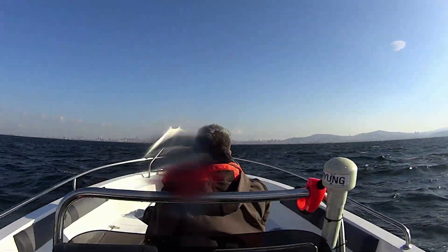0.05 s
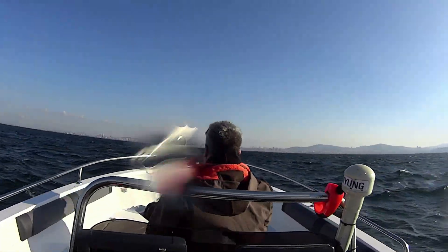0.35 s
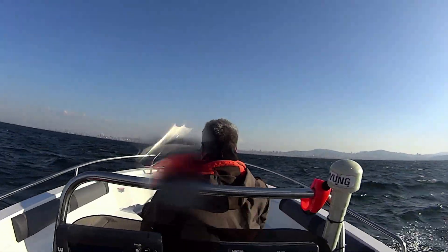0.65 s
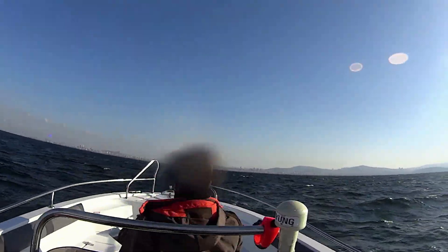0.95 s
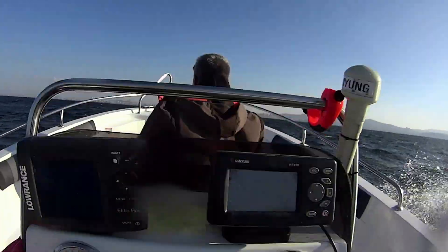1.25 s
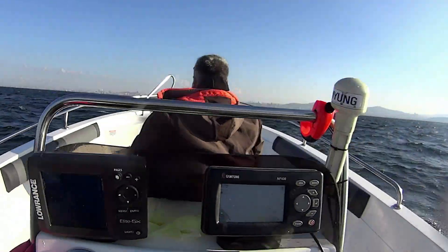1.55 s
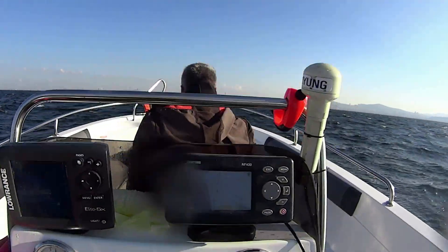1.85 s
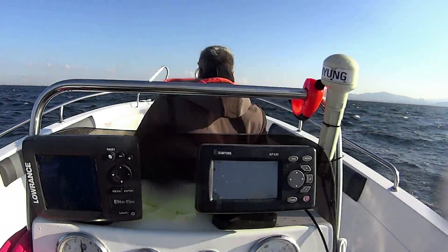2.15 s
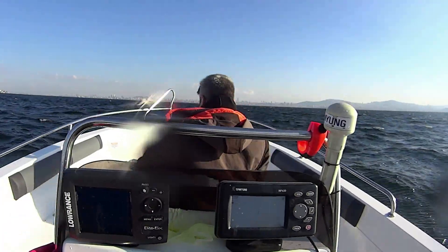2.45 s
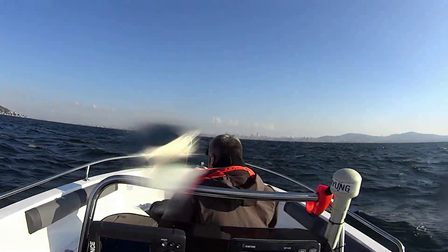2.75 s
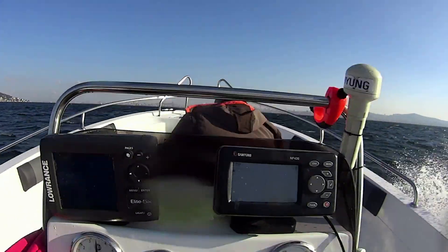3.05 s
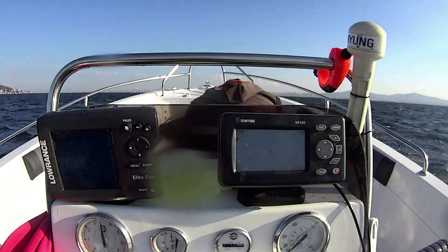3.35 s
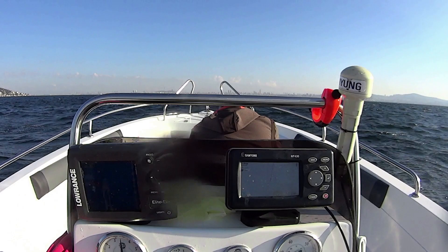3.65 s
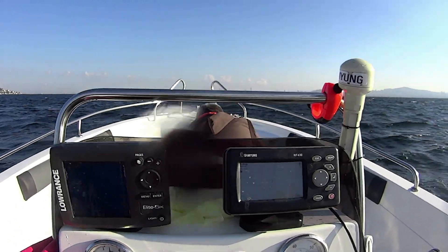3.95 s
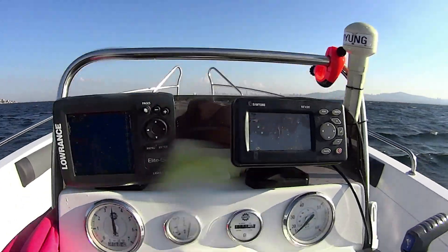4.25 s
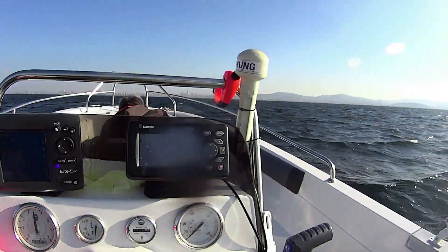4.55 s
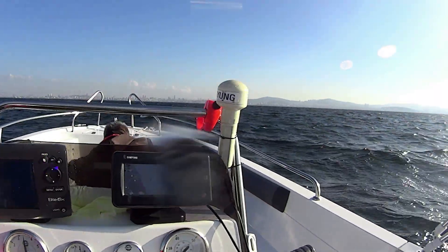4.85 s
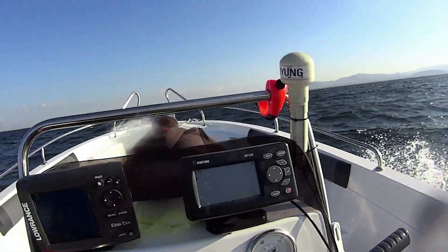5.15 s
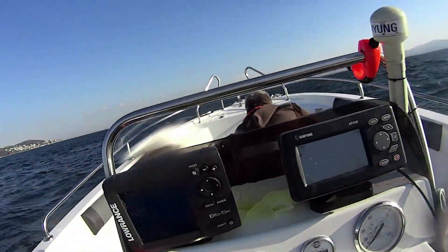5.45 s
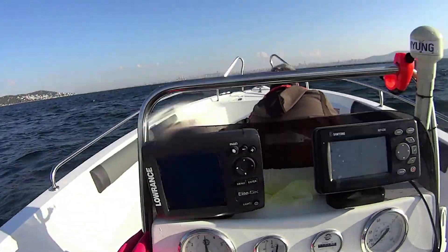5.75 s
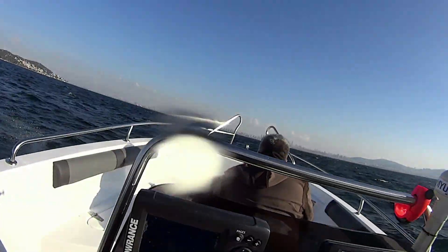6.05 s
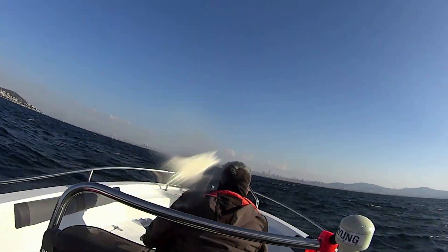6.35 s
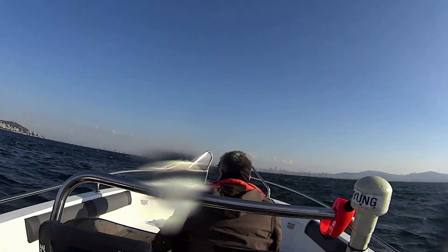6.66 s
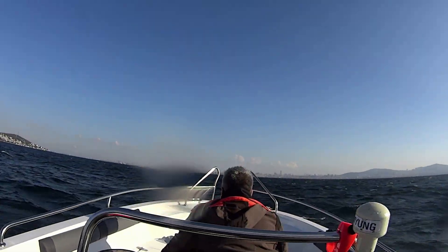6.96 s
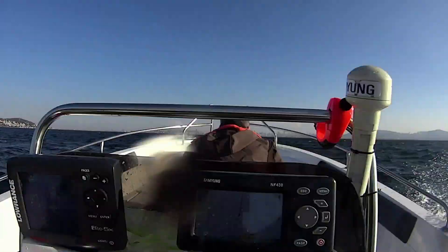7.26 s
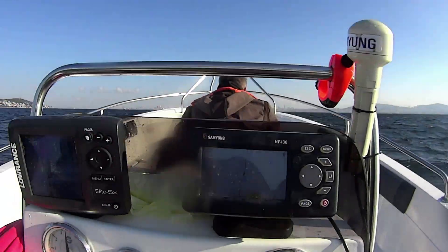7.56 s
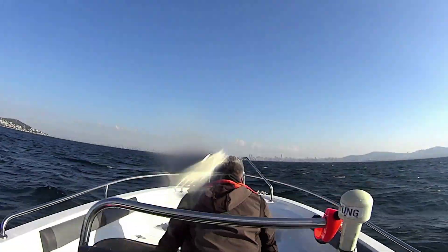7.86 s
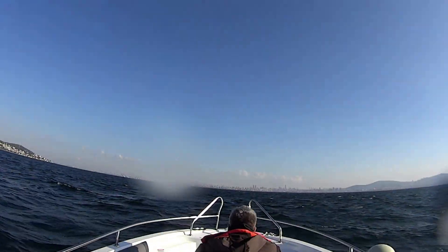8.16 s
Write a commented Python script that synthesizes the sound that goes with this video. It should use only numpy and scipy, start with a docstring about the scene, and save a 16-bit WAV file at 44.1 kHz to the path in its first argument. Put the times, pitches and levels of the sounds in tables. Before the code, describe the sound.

A small motorboat runs through choppy sea, with gusting wind, a steady outboard drone, hollow rushing water and sharp wave slaps.

```python
"""A small open motorboat runs through choppy sea, heard from inside a waterproof case at the helm.
From the start wind buffets the case and whistles at its edge, the outboard drones, the bow thumps and slaps
into waves, and rushing water rings the shell, hollow and nasal. Just before 5 s loose gear raps; then spray
hisses, hard drops strike and the wet case sings. Near 7 s the wind moans and a big wave smacks the hull,
and the ride ends in rising wind and water."""
import sys
import numpy as np
from scipy import signal
from scipy.fft import rfft, irfft, next_fast_len
from scipy.io import wavfile
from scipy.ndimage import uniform_filter1d, map_coordinates

SR = 44100
rng = np.random.default_rng(int(sys.argv[2]) if len(sys.argv) > 2 else 0)


def inscribe(sig):
    """Save sig as 16-bit PCM at rate SR to the path in sys.argv[1].

    A 1-D sig is mono; a 2-D sig holds one channel per row.
    Samples are clipped to [-1, 1] before scaling.
    """
    pcm = np.round(np.clip(np.atleast_2d(sig).T, -1, 1) * 32767)
    wavfile.write(sys.argv[1], SR, pcm.astype(np.int16))


N = 370440

# Air speed over the case. Each row: time in seconds, buffeting level in dB.
AIR_SPEED = [(0, -36), (0.45, -34.5), (0.62, -34), (1.0, -34), (1.35, -37), (1.6, -38.5), (1.85, -33),
             (2.03, -36), (2.25, -30.5), (2.55, -33.5), (2.9, -28.5), (3.35, -36.5), (3.6, -34),
             (4.1, -32.5), (4.6, -37.5), (5.75, -33), (6.45, -32), (6.63, -33.5), (7.2, -28.5),
             (7.33, -40.5), (7.6, -36), (8.0, -29.5), (8.4, -30.5)]
# The hollow resonances of the case's shell. Each row: centre in Hz, width in Hz, gain in dB.
SHELL_MODES = [(1509, 105, 9.5), (1654, 93, 7), (1873, 94, -1.5), (2320, 83, -15), (2750, 190, -8.5),
               (4050, 780, -15)]
# The bright colour of a splash or a snap. Each row: frequency in Hz, level in dB.
SPLASH_SPECTRUM = [(400, -10), (1200, -5), (2300, 4.5), (3500, -4), (4700, -0.5), (6200, -10),
                   (7500, -12.5), (11000, -29.5)]
USUAL_AIR_DB = -32


def wind():
    """Eddies buffet the case; the faster ones whistle at its edge and make the shell sizzle."""
    # Brief lulls. Each row: time in seconds, drop in dB.
    lulls = [(.48, 9), (1.3, 12), (3.33, 6), (4.035, 10), (4.79, 2), (6.16, 2.5), (6.675, 3.5), (7.55, 3),
             (8.16, 2)]
    # The hardest gusts. Each row: time in seconds, then buffet, whistle and sizzle levels in dB.
    gusts = [(.63, -32, -35, -45), (.86, -35, -43, -50), (.95, -49, -61, -44), (1.42, -41, -42, -56),
             (1.635, -40, -39, -50), (2.28, -44, -42, -44), (3.21, -35.5, -43, -58),
             (3.975, -33, -30.5, -55), (4.11, -36, -35, -49), (4.885, -32.5, -37.5, -43.5),
             (5.88, -26.5, -44, -54), (6.015, -34, -31.5, -50), (6.228, -30, -27, -44),
             (6.43, -33, -35, -43), (7.246, -29.5, -34, -46), (7.869, -33.5, -34.5, -48),
             (8.065, -26, -38, -52)]
    # How readily the edge whistles. Each row: time in seconds, level in dB at the usual air speed.
    whistle_levels = [(0, -44.5), (1.0, -49.5), (2.3, -48), (2.8, -52), (3.6, -43.5), (4.6, -54.5),
                      (6.1, -41.5), (8.4, -48.5)]
    # The shell's sizzle. Each row: time in seconds, level in dB.
    sizzle_levels = [(0, -48), (0.3, -56), (0.6, -47.5), (0.93, -51), (1.3, -57.5), (1.85, -50),
                     (2.03, -65), (2.25, -53), (2.85, -47.5), (3.3, -60.5), (3.7, -52.5), (4.55, -55.5),
                     (5.4, -55), (6.4, -49), (6.7, -52), (7.15, -47), (7.45, -62), (8.0, -51.5),
                     (8.4, -51.5)]
    # Low buffet, sharp whistle and thin sizzle. Each row: frequency in Hz, level in dB.
    buffet_spectrum = [(50, -11), (110, 0), (170, 0), (250, -0.5), (380, -0.5), (480, -5), (700, -17.5),
                       (1000, -23), (1400, -16.5), (2300, -16.5), (3500, -36), (6000, -61)]
    whistle_spectrum = [(1800, -2), (2700, -6), (3150, 1), (3350, 3), (3550, 4.5), (3750, -4.5), (4000, -9),
                        (6000, -50)]
    sizzle_spectrum = [(3600, -53), (4350, -1), (4720, 5), (5020, -3.5), (5500, -10), (7000, -24)]
    eddies_per_s, flutter_per_s, hold_from_db = 42, 125, -45
    (air_db,), (ready_db,), (sizzle_db,) = curves(AIR_SPEED), curves(whistle_levels), curves(sizzle_levels)
    air_db = air_db - sum(db * swell(s, half_length=0.027) for s, db in lulls)
    eddies = wobble(eddies_per_s)
    gust_shapes = np.array([swell(s, half_length=0.013) for s, *_ in gusts])
    gust_buffet, gust_whistle, gust_sizzle = amp(np.array(gusts)[:, 1:]).T @ gust_shapes
    buffet = np.hypot(amp(air_db + 1.28 * eddies), gust_buffet) * rush(colour(buffet_spectrum), grain_db=1.5)
    # the whistle grows much faster with air speed than the buffeting does
    whistle_db = ready_db + 2.43 * (air_db - USUAL_AIR_DB)
    # it catches and drops out in gritty bursts; in hard air they run together into a rattle
    catching = np.tanh(1.3 * eddies + 1.5 * wobble(flutter_per_s) - .3)
    held = np.clip((whistle_db - hold_from_db) / 2, 0, 0.6)
    flutter_db = 8.5 * ((1 - held) * catching + 0.44 * held)
    whistle_gain = np.hypot(amp(whistle_db + flutter_db), gust_whistle * amp(4.4 * catching - 3.0))
    whistle = whistle_gain * rush(colour(whistle_spectrum))
    sizzle_gain = np.hypot(amp(sizzle_db + 0.92 * eddies + 2.8 * wobble(70)), gust_sizzle)
    return buffet + whistle + sizzle_gain * rush(colour(sizzle_spectrum))


def water():
    """The bow wave churns along the hull and rings the shell; sheets of it break into spray."""
    # Water rushing along the hull. Each row: time in seconds, level in dB.
    rush_levels = [(0, -39), (0.2, -37.5), (0.5, -42), (1.0, -36.5), (1.35, -42), (1.95, -39), (2.5, -39),
                   (3.35, -39.5), (3.9, -37), (4.75, -38), (5.4, -34.5), (5.75, -36.5), (6.0, -34),
                   (6.8, -39.5), (7.17, -32.5), (7.35, -40), (7.68, -38), (8.1, -32.5), (8.4, -33)]
    # Sheets of water thrown from the bow, and one short, bright knock near 3.8 s.
    # Each row: time in seconds, level in dB, half length in seconds, spray level in dB.
    surges = [(1.1, -38.5, 0.12, -84), (1.888, -28.5, 0.045, -56), (3.678, -33.5, 0.041, -55),
              (3.831, -24.5, 0.0051, -56), (4.21, -31, 0.059, -64), (5.316, -34, 0.031, -40.5),
              (5.502, -38, 0.043, -40), (5.71, -35.5, .016, -37.5), (7.142, -51, 0.099, -53)]
    # The shell's strongest ring. Each row: centre in Hz, width in Hz, gain in dB.
    note_modes = [(1594, 114, 0.5), (1444, 140, -3)]
    # Open wash, the sheets and knock, and fine spray. Each row: frequency in Hz, level in dB.
    wash_spectrum = [(200, -69), (700, 14.5), (1150, 1.5), (2100, 6), (2600, -38), (3100, -25), (4000, -15),
                     (5000, -27), (7000, -23)]
    surge_spectrum = [(300, 3), (1000, -12), (1400, 8.5), (1800, 8.5), (2300, 4.5), (2800, -3.5),
                      (4000, -14), (4700, -8.5), (6500, -24), (11000, -44)]
    spray_spectrum = [(1000, 10.5), (2500, 9.5), (4000, 6.5), (5300, 5.5), (6400, 1.5), (7300, 2.5),
                      (8500, -1), (10500, -6)]
    usual_rush_db, mist_db = -35.5, -49.5
    (rush_db,), (air_db,) = curves(rush_levels), curves(AIR_SPEED)
    churn = amp(rush_db + 3.14 * np.tanh(wobble(25)))
    hollow = amp(-2) * rush(ringing(SHELL_MODES), grain_db=2.5)
    # the wash grows as the wind tears at the water
    wash = amp(-12.5 + 0.37 * (air_db - USUAL_AIR_DB)) * rush(colour(wash_spectrum), grain_db=3.5)
    # faster water rings the shell much harder
    note = amp(-39 + 2.26 * (rush_db - usual_rush_db)) * rush(lambda hz: ringing(note_modes)(hz) ** 2)
    surging = sum(amp(db) * swell(s, half_length) for s, db, half_length, _ in surges)
    showers = sum(amp(db) * swell(s, half_length) for s, _, half_length, db in surges)
    sheets_and_knock = surging * rush(colour(surge_spectrum), grain_db=4.0)
    spray = (amp(mist_db) + showers) * rush(colour(spray_spectrum), grain_db=1.46)
    return churn * (hollow + wash) + note + sheets_and_knock + spray


def waves():
    """Each slap rings the shell at its own pitch, with a splash; hard landings knock and thump the hull."""
    # Waves slapping the hull. Each row: start in seconds, level in dB, rise and decay in seconds,
    # splash in dB relative to the slap, ring pitch in Hz.
    slaps = [(.139, -30, 0.0012, 0.0059, -17, 1550), (.164, -30, .0012, .016, -13, 1487),
             (1.066, -26, 0.0014, 0.0097, -23, 1736), (1.116, -24.5, .0014, 0.0074, -9, 1560),
             (1.987, -26.5, 0.0011, 0.0072, -16, 1690), (3.818, -25, 0.0014, 0.0061, -9, 1940),
             (3.983, -20.5, 0.0035, 0.0046, -17, 1470), (4.206, -27.5, .004, 0.046, -27, 1634),
             (4.365, -25, .002, 0.0048, -13, 1490), (4.965, -34.5, 0.0047, 0.012, 1, 1540),
             (5.478, -23, 0.0022, 0.013, -4, 1536), (5.53, -22, 0.0036, 0.013, -8, 1525),
             (5.547, -15.5, 0.0042, 0.0018, -14.5, 1900), (5.962, -20.5, 0.0014, 0.0036, -23, 1470),
             (6.028, -25, 0.0067, 0.021, -27, 1530), (6.613, -26, 0.0043, 0.007, -11, 1531),
             (7.1503, -16, 0.0039, .013, -15, 1470), (7.185, -20.5, .004, 0.023, -24, 1520),
             (7.26, -25, .003, 0.023, -34, 1633), (7.472, -24.5, 0.0019, 0.0064, -10, 1424)]
    # The hull landing. Each row: start in seconds, level in dB, decay in seconds, knock pitch in Hz.
    thumps = [(0.051, -23.5, 0.013, 100), (0.696, -30, 0.025, 189), (1.412, -31, 0.042, 330),
              (1.754, -21.5, 0.025, 175), (2.31, -33, 0.013, 95), (3.647, -23.5, 0.027, 200),
              (3.899, -26, 0.032, 122), (3.975, -26, 0.017, 98), (4.867, -21.5, 0.013, 125),
              (5.086, -25, 0.028, 341), (5.131, -29.5, 0.023, 233), (5.534, -13.5, 0.0047, 220),
              (5.5396, -14, 0.0051, 480), (5.545, -23, 0.0042, 632), (5.554, -22, 0.0048, 1050),
              (5.566, -24, .008, 207), (5.598, -25, 0.016, 92), (6.023, -18, 0.012, 177),
              (7.178, -22, 0.013, 101), (7.178, -16, 0.0045, 280)]
    # A slap's drive on the shell, and the hull's thud. Each row: frequency in Hz, level in dB.
    smack_spectrum = [(600, 5), (1000, -16), (1350, 2.5), (2400, -8), (3000, -7), (3600, -4), (4500, -6)]
    thud_spectrum = [(25, -12), (70, -2), (130, -1), (215, 6.5), (340, 3), (580, -9.5), (900, -8),
                     (1300, -12), (2000, -7), (5000, -45)]
    landing_rise_s, landing_db = 0.0029, -4
    blows = [amp(db) * burst(s, rise, decay) for s, db, rise, decay, *_ in slaps]
    splashing = sum(blow * amp(splash_db) for blow, (*_, splash_db, _hz) in zip(blows, slaps))
    thwacks = sum(amp(db - 3) * burst(s, rise, decay, hz) for s, db, rise, decay, _, hz in slaps)
    landings = sum(amp(db + landing_db) * burst(s, landing_rise_s, decay) for s, db, decay, _ in thumps)
    knocks = sum(amp(db + landing_db) * burst(s, landing_rise_s, decay, hz) for s, db, decay, hz in thumps)
    shell_noise = rush(lambda hz: ringing(SHELL_MODES)(hz) * colour(smack_spectrum)(hz))
    smacks = sum(blows) * amp(-1.5) * solid(shell_noise, size=200)
    thuds = landings * solid(rush(colour(thud_spectrum)), size=500)
    splashes = splashing * rush(colour(SPLASH_SPECTRUM), grain_db=-1.5)
    return smacks + splashes + thuds + filtered(thwacks + knocks, ports)


def outboard():
    """The motor drones on its shaft harmonics; its speed sags and recovers as the propeller takes load."""
    # The drone's partials. Each row: multiple of the shaft rate, level in dB.
    harmonics = [(2, -41.5), (4, -49.5), (5, -42.5), (6, -40.5), (7, -47.5), (10, -54.5), (17, -58.5),
                 (19, -56)]
    # The drone swells and eases as the boat pitches. Each row: time in seconds, gain in dB.
    drone_gains = [(0, -.5), (.7, 3), (1.25, -.5), (2.8, 2.5), (3.4, 0), (4.6, -1), (5.8, -2), (7.15, 2),
                   (7.45, 1.5), (8.4, -0.5)]
    shaft_hz = 58.4
    speed = shaft_hz * (1 + 0.001617 * wobble(2.477) + 0.0022 * wobble(22))
    angle = 2 * np.pi * np.cumsum(speed) / SR
    drone = sum(amp(db + 1.48 * wobble(7)) * np.sin(round(k) * angle + rng.uniform(0, 2 * np.pi))
                for k, db in harmonics)
    drone_db, = curves(drone_gains)
    return filtered(amp(drone_db) * drone, ports)


def drops():
    """A drop on the case gives a dry tick, a crisp crack and a brief ring of the shell."""
    # Drops landing. Each row: time in seconds, strength in dB, then ring and crack offsets in dB.
    hits = [(2.281, -24, -30, 4), (4.28, -24, -14, -11), (5.009, -34, -7, 12), (5.55, -10, -14, -7),
            (6.2536, -5.5, -17, -22), (7.1977, -11, -11, -9)]
    # The case's tick and crack. Each row: centre in Hz, width in Hz, gain in dB.
    tick_modes = [(1880, 210, 2.5), (4320, 200, -2)]
    crack_modes = [(4730, 160, 3.5), (7160, 270, -4), (9800, 900, -11)]
    ticks, rings, cracks = np.zeros((3, N))
    for s, db, ring_db, crack_db in hits:
        at = round(s * SR)
        ticks[at] = amp(db + 23.5)
        rings[at] = amp(db + ring_db + 35.5)
        cracks[at] = amp(db + crack_db + 28.0)
    layers = (ticks, tick_modes), (rings, SHELL_MODES), (cracks, crack_modes)
    return filtered(sum(filtered(pulses, ringing(modes)) for pulses, modes in layers), ports)


def raps():
    """Loose gear strikes the boat: a bright snap and a short, hard ring."""
    # The raps. Each row: start in seconds, level in dB, length factor, snap in dB relative to the rap.
    hits = [(4.7065, -11.5, 0.97, -8), (4.7114, -15, 0.94, -16), (4.915, -17.5, 3.5, -6)]
    # The gear's ring. Each row: pitch in Hz, level in dB, decay in seconds at length factor 1.
    gear_modes = [(1480, -2, 0.0024), (1467, -14, .017), (1820, -5.5, 0.0024), (1990, -19, .014),
                  (2360, -11, 0.0046), (4500, -26, 0.0023), (4930, -16, 0.00098)]
    rise_s, snap_s = 0.0017, 0.0032
    rings = sum(amp(db + mode_db) * burst(s, rise_s * length, decay * np.sqrt(length), hz)
                for s, db, length, _ in hits for hz, mode_db, decay in gear_modes)
    snaps = sum(amp(db + snap_db) * burst(s, rise_s * length / 2, snap_s * length)
                for s, db, length, snap_db in hits)
    return filtered(rings, ports) + snaps * solid(rush(colour(SPLASH_SPECTRUM)), size=100)


def singing():
    """In heavy spray the wet case sings: a narrow ring whose pitch wanders and settles."""
    # The ring's path. Each row: time in seconds, pitch in Hz, pitch spread in Hz, level in dB.
    ring_path = [(4.95, 1594, 38.6, -80), (5.1, 1610, 26.6, -46), (5.33, 1612, 28.7, -33.5),
                 (5.52, 1574, 31, -34.5), (5.62, 1600, 17, -42), (5.69, 1636, 5, -33), (5.77, 1636, 3, -39),
                 (5.82, 1566, 14, -53), (5.875, 1535, 8.1, -33), (5.92, 1540, 13, -34.5),
                 (6.05, 1505, 25.5, -57), (6.35, 1560, 53, -38), (6.85, 1553, 50, -42),
                 (7.17, 1524, 42, -32), (7.36, 1563, 31, -39.5), (7.5, 1550, 40, -80)]
    return wavering(*curves(ring_path))


def moan():
    """The strongest wind raises a low moan that dips and then climbs."""
    # The moan's path. Each row: time in seconds, pitch in Hz, level in dB.
    moan_path = [(6.65, 390, -83), (6.8, 385, -39), (7.0, 370, -39), (7.13, 390.4, -33.5), (7.4, 394, -82)]
    hz, db = curves(moan_path)
    return wavering(hz, spread_hz=13.46, db=db)


def hull():
    """The hull rumbles as it pushes through the chop."""
    # The chop's pounding. Each row: time in seconds, relative level in dB.
    pounding = [(0, -46), (1.0, -47), (1.3, -53), (2.25, -37.5), (2.7, -45.5), (3.05, -41), (3.4, -45.5),
                (4.05, -38), (4.6, -47), (5.2, -39.5), (6.0, -50), (6.7, -54), (7.0, -50), (8.4, -50)]
    # The deep rumble. Each row: frequency in Hz, level in dB.
    rumble_spectrum = [(15, -32), (35, -6), (62, 4.5), (100, 4), (150, -11.5), (250, -23), (600, -64)]
    rumble_db, = curves(pounding)
    return amp(rumble_db + 4.0 + 2.7 * wobble(15)) * rush(colour(rumble_spectrum))


def ringing(modes):
    """The response of resonances of the case, muffled by its wall."""
    wall_hz = 4700
    body = lambda hz: sum(amp(db) * 1j * hz * width / (centre * centre - hz * hz + 1j * hz * width)
                          for centre, width, db in modes)
    return lambda hz: body(hz) / (1 + 1j * hz / wall_hz) ** 2


def ports(hz):
    """Gain and phase of the paths through the case to the left and right microphone port."""
    # Stereo balance. Each row: frequency in Hz, left over right in dB.
    balance = [(150, -3.5), (450, -1), (1000, 3), (1550, 5), (2400, 5), (3100, -1), (6500, 0.9),
               (9000, 1.5)]
    # Stereo phase. Each row: frequency in Hz, the left port's lead in radians.
    lead = [(30, 0), (120, -.25), (250, -.75), (500, -1.1), (750, -.1), (950, -1.5), (1550, -.65),
            (2200, -1.75), (2900, 1), (3300, 1.2), (3500, -1.4), (3900, -2.6), (4400, -.7), (5600, -.9),
            (7000, -2.2)]
    half = np.array([[.5], [-.5]])
    return amp(half * along(balance, hz)) * np.exp(1j * half * along(lead, hz))


def rush(response, grain_db=0):
    """Stereo noise of rms 1, as the ports hear it; grain_db clumps it into grains of a few ms."""
    # How alike the two ports sound. Each row: frequency in Hz, coherence from 0 to 1.
    coherence = [(60, .92), (160, .78), (350, .7), (650, .3), (950, .4), (1500, .95), (2000, .8),
                 (2700, .35), (3700, .62), (4100, .3), (4800, .73), (6000, .2), (11000, .3)]
    size = next_fast_len(N + SR // 4)
    hz = np.fft.rfftfreq(size, 1 / SR)
    noise = rng.standard_normal((2, N))
    if grain_db:
        noise = noise * amp(grain_db * wobble(330))
    mid, side = rfft(noise, size)
    width = np.arccos(np.clip(along(coherence, hz), 0, 1)) / 2
    pair = (np.cos(width) * mid + np.sin(width) * side * np.array([[1], [-1]])) * ports(hz)
    return unit(irfft(pair * response(hz), size)[:, :N])


def wavering(hz, spread_hz, db):
    """A narrow ring whose pitch and level tremble."""
    angle = 2 * np.pi * np.cumsum(hz + spread_hz * wobble(130)) / SR
    return filtered(amp(db + 2.4 * wobble(60)) * np.sqrt(2) * np.sin(angle), ports)


def burst(start, rise, decay, hz=0):
    """An envelope that climbs to 1 and dies away; with hz, a tone of that rms."""
    t = np.arange(SR // 2) / SR
    shape = np.clip(t / rise, 0, 1) * np.exp(-np.clip((t - rise) / decay, 0, 50))
    if hz:
        shape = shape * np.sqrt(2) * np.sin(2 * np.pi * hz * t)
    return np.pad(shape, (round(start * SR), N))[:N]


def swell(s, half_length):
    """A bell-shaped envelope around time s."""
    u = np.linspace(-5, 5, 81)
    return np.interp(clock(), s + u * half_length, np.exp(-.5 * u ** 2), left=0, right=0)


def solid(x, size):
    """Noise held at rms 1 over size samples, so that a blow lands with its full force."""
    return x / np.sqrt(np.abs(uniform_filter1d(x.mean(0) ** 2, size)) + 1e-4)


def wobble(rate):
    """A smooth random curve with rate knots a second."""
    return map_coordinates(rng.standard_normal(4096), [clock() * rate], mode="mirror")


def curves(rows):
    """One value per sample for each column after the time."""
    times, *columns = np.transpose(rows)
    return [np.interp(clock(), times, column) for column in columns]


def filtered(x, response):
    """x shaped by a complex frequency response."""
    size = next_fast_len(N + SR // 4)
    return irfft(rfft(x, size) * response(np.fft.rfftfreq(size, 1 / SR)), size)[..., :N]


def colour(points):
    """The response of a (Hz, dB) spectrum."""
    return lambda hz: amp(along(points, hz))


def along(points, hz):
    """(Hz, value) points joined on a log axis."""
    freqs, values = np.transpose(points)
    return np.interp(np.log(hz + 1), np.log(freqs + 1), values)


def unit(x):
    """Scale to rms 1; a stereo pair is judged by its mid signal."""
    return x / np.sqrt(np.mean(np.atleast_2d(x).mean(0) ** 2) + 1e-20)


def amp(db):
    """Decibels to gain."""
    return 10 ** (np.asarray(db) / 20)


def clock():
    """The time of every sample in seconds."""
    return np.arange(N) / SR


def scene():
    """Engine, wind and sea together."""
    return outboard() + wind() + moan() + hull() + water() + singing() + waves() + raps() + drops()


def record(dry):
    """The top of the treble is cut off sharply."""
    top_hz = 11200
    return filtered(dry, lambda hz: hz < top_hz)


dry = scene()
out = record(dry)
inscribe(out)
```